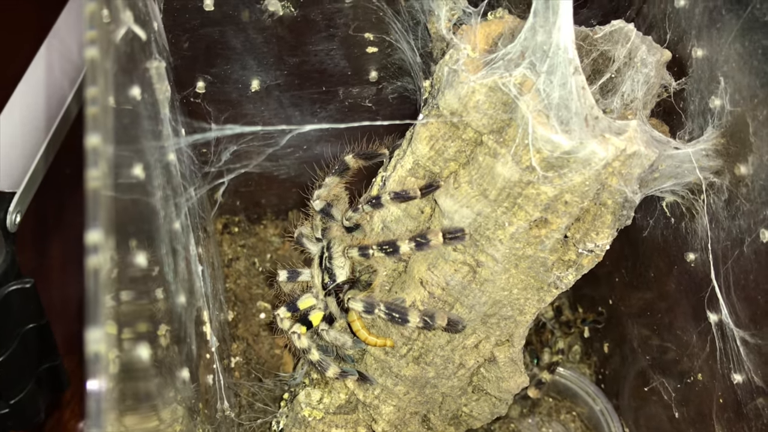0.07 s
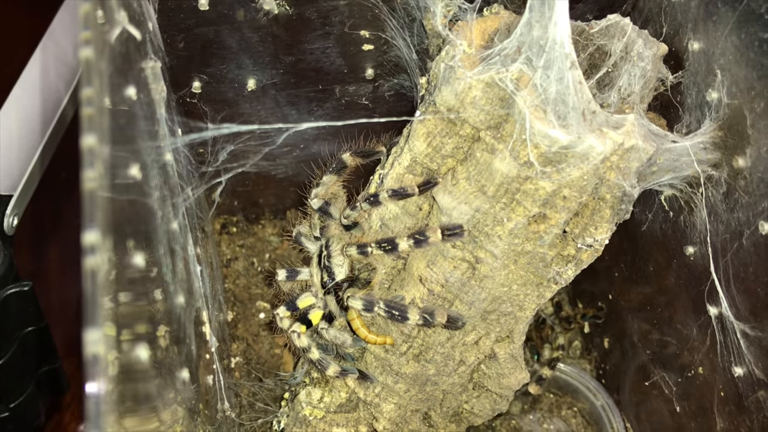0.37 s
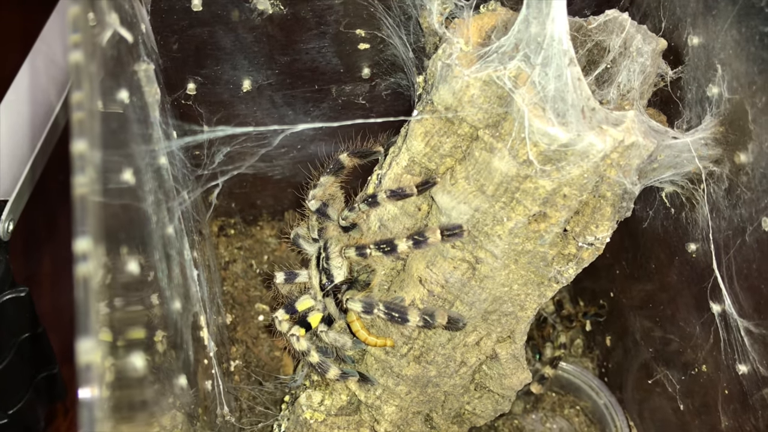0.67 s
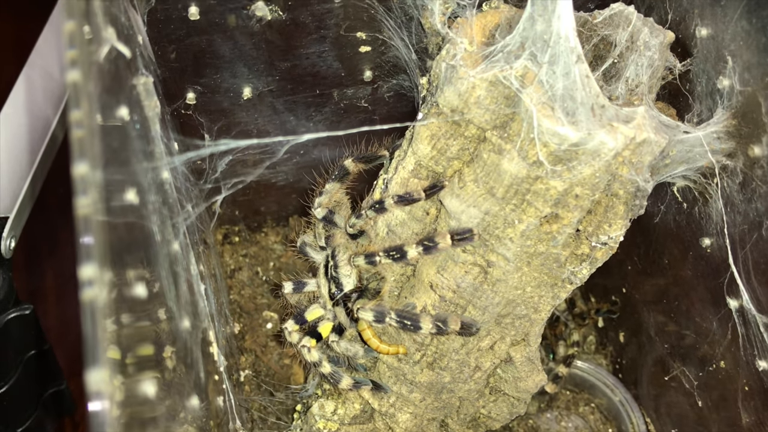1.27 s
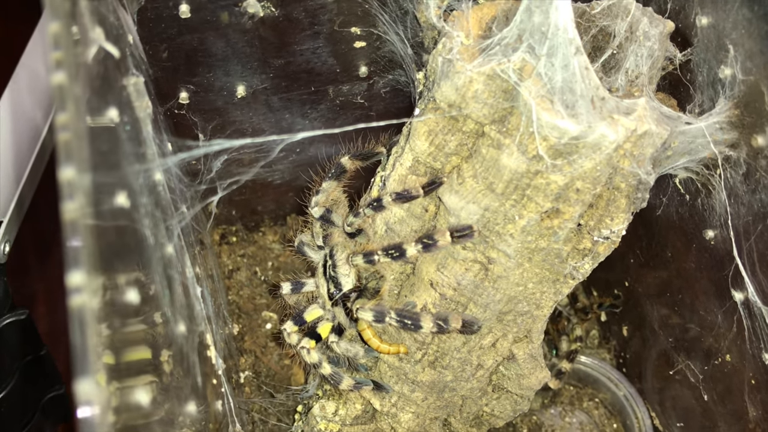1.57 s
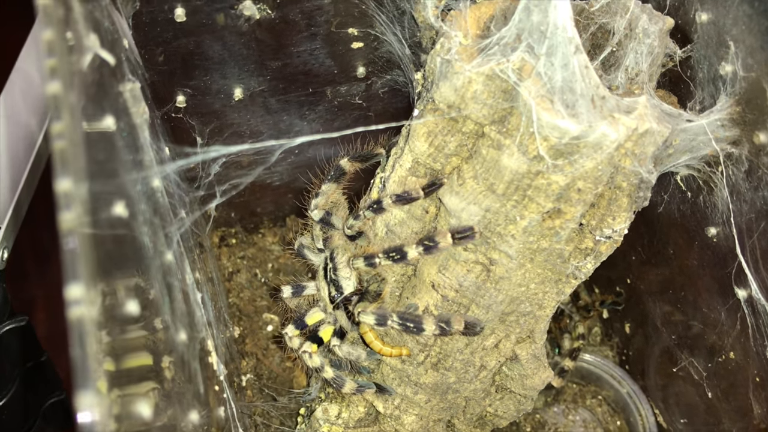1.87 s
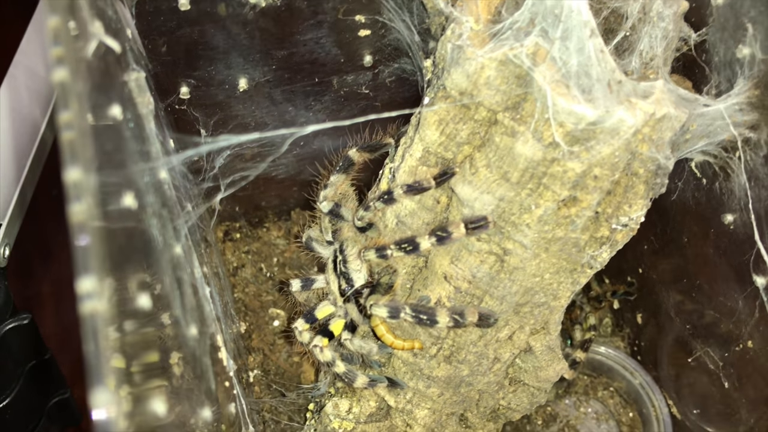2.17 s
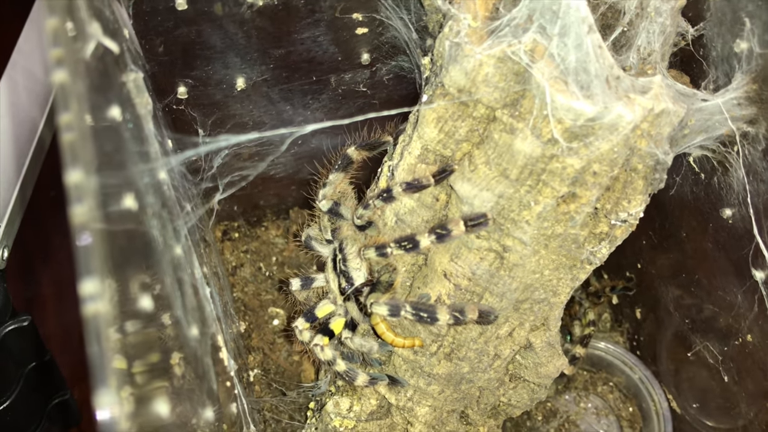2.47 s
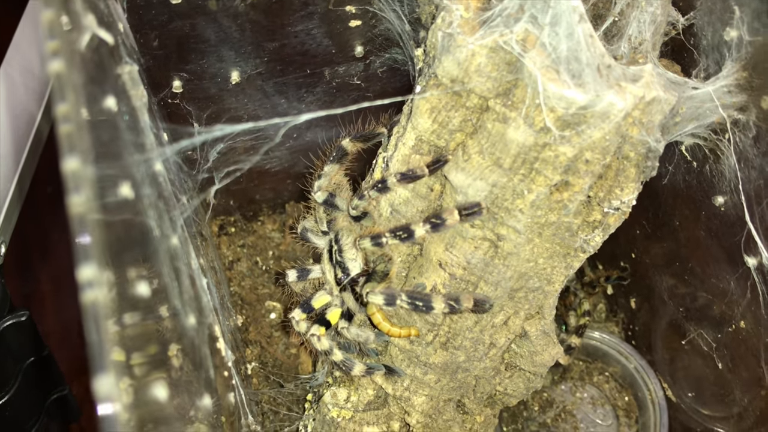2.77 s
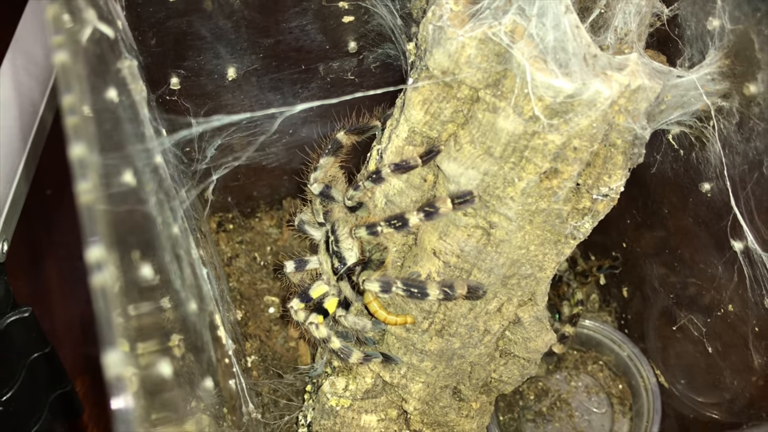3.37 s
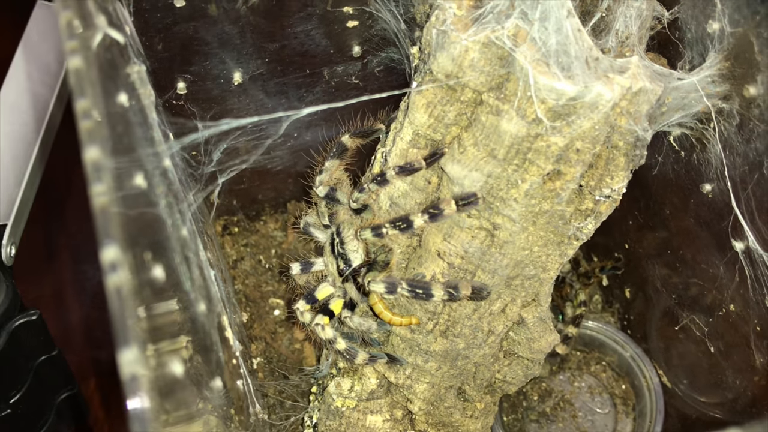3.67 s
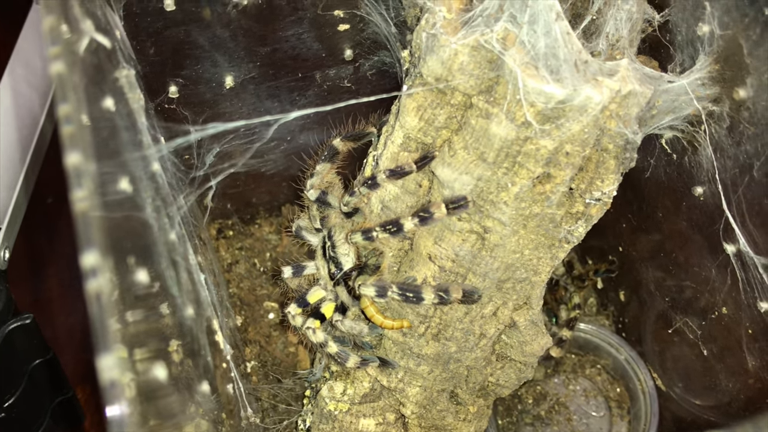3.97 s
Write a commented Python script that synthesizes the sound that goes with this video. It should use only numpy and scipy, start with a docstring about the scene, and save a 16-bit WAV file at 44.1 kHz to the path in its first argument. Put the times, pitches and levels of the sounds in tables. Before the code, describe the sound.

Close handling noise on a camera: scratchy rubs, soft low thumps and sharp little ticks.

```python
"""Fingers shifting on a camera

In a quiet room, fingers change their grip on a camera held over a plastic spider enclosure.
Skin scrapes the casing in short strokes and one longer rub, then in sparser, duller nudges.
Slipping fingertips shudder with a falling low note, the casing bumps softly, and a few dry ticks snap."""
import sys
import numpy as np
from scipy.fft import rfft, irfft, next_fast_len
from scipy.io import wavfile
from scipy.ndimage import map_coordinates

SR = 44100
rng = np.random.default_rng(int(sys.argv[2]) if len(sys.argv) > 2 else 0)


def master(y):
    """Save y as 16-bit WAV."""
    cut = np.clip(np.atleast_2d(y).T, -1, 1)
    pcm = np.round(cut * 32767)  # scale
    wavfile.write(sys.argv[1], SR, pcm.astype(np.int16))


N = 176400


def amp(db):
    """Turn decibels into a number to multiply a sound by."""
    return 10 ** (np.asarray(db) / 20)


def unit(x):
    """Scale a sound to an average strength (rms) of 1."""
    return x / np.sqrt(np.mean(x ** 2) + 1e-20)


def tone_gain(points, hz):
    """Read the gain at each frequency from a curve of (pitch_hz, level_db) points."""
    pitch_hz, level_db = np.transpose(points)
    return amp(np.interp(np.log(hz + 1), np.log(pitch_hz + 1), level_db))


def filtered(x, response):
    """Turn each frequency in a sound up or down by response(hz)."""
    size = next_fast_len(N + SR // 2)
    return irfft(rfft(x, size) * response(np.fft.rfftfreq(size, 1 / SR)), size)[:N]


def highpass(hz, edge_hz, order):
    """Gain that fades out below edge_hz; a higher order is steeper."""
    return np.sqrt(1 - 1 / (1 + (hz / edge_hz) ** (2 * order)))


def shaped_noise(points):
    """Steady noise whose tone follows (pitch_hz, level_db) points."""
    return unit(filtered(rng.standard_normal(N), lambda hz: tone_gain(points, hz)))


def wobble(per_s):
    """A smooth curve through per_s random values each second."""
    values = rng.standard_normal(int(N * per_s / SR) + 4)
    return map_coordinates(values, [np.arange(N) * per_s / SR])


def add(track, start_s, sound):
    """Mix a sound into the track at start_s."""
    start = max(0, round(start_s * SR))
    part = track[start:start + len(sound)]
    part += sound[:len(part)]


def falling_note(t, start_hz, end_hz, sag_s):
    """A vibration whose pitch falls as the contact relaxes."""
    pitch_hz = end_hz + (start_hz - end_hz) * np.exp(-t / sag_s)
    return np.sin(2 * np.pi * np.cumsum(pitch_hz) / SR)


def room(level_db=-65):
    """The low murmur of room air, with microphone hiss."""
    # Tone of the background: pitch_hz, relative_db
    room_tone = [(24, -42), (40, 9), (140, 6.5), (479, -16), (615, -13), (1050, -19.5), (1850, -30.5),
                 (2910, -28.5), (3560, -46), (6170, -26)]
    return amp(level_db) * shaped_noise(room_tone)


def ticks(faint_per_s=10, faint_db=-57, faint_edge_hz=3000, splinter=0.44, splinter_decay_s=0.00021):
    """Hard plastic snaps and splinters for under a millisecond, among faint random ticks."""
    # The clear ticks: time_s, level_db, low_edge_hz
    clear_ticks = [(1.4552, -42, 4000), (1.5718, -47.5, 5000), (1.6791, -46.5, 1500), (1.7272, -32, 1250),
                   (1.7791, -32, 1100), (1.9836, -43.5, 7900), (2.5174, -46, 8000), (2.6602, -49.5, 2000),
                   (2.8472, -47.5, 5500), (3.5877, -46.5, 1990)]
    # Tone of a tick: pitch_hz, relative_db
    tick_tone = [(500, 10), (3000, 2), (9000, 3.5), (12500, 2), (15500, -21.5)]
    out, hz = np.zeros(N), np.fft.rfftfreq(512, 1 / SR)
    t = np.arange(len(hz)) / SR
    chance = rng.random((int(faint_per_s * N / SR), 2))
    faint_ticks = [(when * N / SR, faint_db + 2 * (2 * size - 1), faint_edge_hz) for when, size in chance]
    for time_s, level_db, edge_hz in list(clear_ticks) + faint_ticks:
        bass_cut = 1j * hz / (edge_hz + 1j * hz) * highpass(hz, edge_hz, order=3)
        snap = np.fft.fftshift(irfft(tone_gain(tick_tone, hz) * bass_cut))
        snap /= np.abs(snap).max()
        splinters = splinter * rng.choice([-1, 1], len(t)) * np.exp(-t / splinter_decay_s)
        splinters[0] = 1  # the first crack is the strongest
        add(out, time_s - len(snap) / 2 / SR, amp(level_db) * np.convolve(snap, splinters))
    return out


def friction(ringing, catches_per_s=2500, spread_db=7.5, catch_share=0.49, drift_db=4):
    """Skin ridges catch over a smooth hiss; the casing's ringing notes come and go as the finger moves."""
    # Tone of sliding skin: pitch_hz, relative_db
    skin_tone = [(260, 11), (450, -0.5), (500, -4.5), (589, 2.5), (782, -2.5), (895, -6), (1340, -9),
                 (1810, -9), (3330, -7), (4990, -10.5), (6930, -11.5), (11500, -14), (13500, -23.5),
                 (15800, -30)]
    # Notes the casing rings at: pitch_hz, width_hz, boost_db (multiplied by ringing)
    casing_notes = [(1380, 300, 5), (1670, 380, 3.5), (3570, 1400, 2.5), (6800, 270, 2)]
    catches = (rng.random(N) < catches_per_s / SR) * rng.choice([-1, 1], N)
    catches = catches * amp(spread_db * np.clip(rng.standard_normal(N), -2, 2))
    sliding = np.sqrt(catch_share) * unit(catches) + np.sqrt(1 - catch_share) * rng.standard_normal(N)
    skin = filtered(sliding, lambda hz: tone_gain(skin_tone, hz) * highpass(hz, edge_hz=357, order=3))
    ring = np.zeros(N)
    for pitch_hz, width_hz, boost_db in casing_notes:
        strength = (amp(ringing * boost_db) - 1) * amp(drift_db * wobble(per_s=35))
        ring += strength * filtered(skin, lambda hz: 1 / (1 + 2j * (hz - pitch_hz) / width_hz))
    return unit(skin + ring)


def rub(hiss_gain_db=5.5, flutter_db=1.0, rumble_gain_db=10.5, lumps_db=6.0, firm_grip_db=-64):
    """The sliding hand hisses and makes the casing rumble; a firm grip holds the rumble down."""
    # Strength of the rub, before the hiss and rumble gains: time_s, level_db
    rub_levels = [(0, -72), (.29, -67), (.33, -77.5), (.44, -78), (.6, -69.5), (.79, -62), (0.92, -70.5),
                  (1.03, -74), (1.1, -70), (1.22, -59.5), (1.38, -58.5), (1.46, -64.5), (1.54, -63.5),
                  (1.62, -70.5), (1.75, -71), (1.84, -66.5), (2.1, -72), (2.38, -68.5), (2.6, -74),
                  (2.82, -78.5), (3.0, -73.5), (3.22, -73), (3.38, -80), (3.62, -76.5), (4, -78.5)]
    # Tone of the rumble: pitch_hz, relative_db
    rumble_tone = [(40, -21), (68, 5), (100, -8.5), (150, -10.5), (300, -14), (700, -52)]
    level_db = np.interp(np.arange(N) / SR, *np.transpose(rub_levels))
    hiss = amp(hiss_gain_db + flutter_db * wobble(per_s=80)) * friction(ringing=0.61)
    rumble = amp(rumble_gain_db + lumps_db * wobble(per_s=30.28)) * shaped_noise(rumble_tone)
    return amp(level_db) * hiss + amp(np.minimum(level_db, firm_grip_db)) * rumble


def bumps(thud_gain_db=5.5, usual_db=-37, rise_s=0.0029, decay_s=0.0039, tail_db=-15, tail_decay_s=0.022,
          clack_hz=720, clack_rise_s=0.0013, clack_decay_s=0.0021, pitch_spread=0.06, sag_spread=0.32):
    """Each padded knock, under a different grip, makes a falling thud and a clack of the stiff shell."""
    # Soft knocks on the casing: start_s, level_db (before thud_gain_db)
    knocks = [(0.05, -34.5), (0.116, -34.5), (0.1811, -36), (0.199, -36.5), (0.2448, -36.5), (0.4964, -34),
              (0.513, -37), (0.561, -36), (0.5952, -35), (0.6145, -36.5), (0.659, -36), (0.6809, -37),
              (0.725, -36), (0.779, -36.5), (0.7959, -36.5), (0.828, -36), (0.8686, -36.5), (0.9525, -42),
              (0.9934, -33), (1.074, -33), (1.119, -36.5), (1.1387, -35), (1.1745, -34.5), (1.2075, -33),
              (1.2328, -37.5), (1.2582, -36.5), (1.2924, -37), (1.316, -34.5), (1.359, -35.5),
              (1.404, -33.5), (1.4237, -31.5), (1.4859, -35), (1.54, -43.5), (1.8435, -30), (1.908, -30.5),
              (1.965, -33), (2.303, -32), (2.402, -29.5), (2.887, -48.5), (2.9847, -30.5), (3.1273, -32),
              (3.439, -44.5), (3.5739, -25), (3.688, -37.5)]
    out, t = np.zeros(N), np.arange(SR // 10) / SR
    rise = 1 - np.exp(-(t / rise_s) ** 3)
    fade = np.exp(-t / decay_s) + amp(tail_db) * np.exp(-t / tail_decay_s)
    clack_shape = (1 - np.exp(-(t / clack_rise_s) ** 2)) * np.exp(-t / clack_decay_s)
    clack = clack_shape * np.sin(2 * np.pi * clack_hz * t)
    grips = np.exp([pitch_spread, sag_spread] * rng.standard_normal((len(knocks), 2)))
    for (start_s, level_db), (tuning, stretch) in zip(knocks, grips):
        hardness_db = level_db - usual_db  # harder knocks start higher and clack more
        start_hz = tuning * (364 + 3.5 * hardness_db)
        clack_db = usual_db - 20 + 1.46 * hardness_db
        note = falling_note(t, start_hz, end_hz=62.8, sag_s=0.00704 * stretch)
        thud = amp(level_db + thud_gain_db) * rise * fade * note
        add(out, start_s, thud + amp(clack_db) * clack)
    return out


def shudders(usual_start_hz=239.9, firm_end_hz=72.2, firm_db=-38, hz_per_db=2.5, usual_length_s=0.0591,
             rise_share=0.3486, pitch_spread=0.065, length_spread=0.083, rough_db=2.5, waver=0.12):
    """A slipping fingertip rocks the camera for a few uneven, slowing shakes, then grips again."""
    # Fingertip slips: loudest_at_s, level_db
    slips = [(0.051, -35.5), (0.11, -33.5), (0.138, -35.5), (.183, -35.5), (0.209, -45), (0.245, -35.5),
             (0.308, -49.5), (0.477, -45), (0.522, -39.5), (0.572, -39.5), (0.65, -40), (0.67, -38.5),
             (0.733, -40.5), (0.758, -39.5), (0.849, -42), (0.894, -35.5), (0.93, -39), (1.014, -46.5),
             (1.041, -43), (1.123, -34.5), (1.163, -34.5), (1.206, -39), (1.242, -37.5), (1.311, -38),
             (1.424, -34), (1.477, -42), (1.536, -39.5), (1.841, -35.5), (1.904, -35), (1.925, -44),
             (1.96, -41.5), (2.022, -37.5), (2.195, -39), (2.224, -36.5), (2.298, -38.5), (2.346, -36.5),
             (2.384, -42), (2.513, -37.5), (2.636, -38), (2.706, -37.5), (2.988, -37), (3.02, -38),
             (3.069, -37), (3.136, -38), (3.159, -35.5), (3.22, -47), (3.291, -39.5), (3.354, -46),
             (3.411, -47), (3.442, -44.5), (3.544, -41.5), (3.707, -45.5)]
    out = np.zeros(N)
    unsteady = np.exp(waver * wobble(per_s=100))
    grips = np.exp([pitch_spread, length_spread] * rng.standard_normal((len(slips), 2)))
    for (loudest_at_s, level_db), (tuning, stretch) in zip(slips, grips):
        length_s = usual_length_s * stretch
        rise_s = length_s * rise_share
        t = np.arange(int(length_s * SR)) / SR
        swell = np.sin(np.pi / 2 * np.interp(t, [0, rise_s, length_s], [0, 1, 0])) ** 2
        usual_end_hz = firm_end_hz + hz_per_db * max(0, firm_db - level_db)  # lighter slips end higher
        bend = tuning * unsteady[round(loudest_at_s * SR):][:len(t)]
        note = falling_note(t, bend * usual_start_hz, bend * usual_end_hz, sag_s=0.01263 * stretch)
        add(out, loudest_at_s - rise_s, amp(level_db) * swell * note)
    return out * amp(rough_db * wobble(per_s=170))


def soft_step(x):
    """Climb smoothly from 0 to 1 as x passes zero."""
    return (1 + np.tanh(x / 2)) / 2


def scrapes(flutter_db=2.0, light_below_db=-4, rise_share=0.12, fall_share=0.25):
    """Skin catches and lets go; light strokes have less treble and more of the casing's ring."""
    # Short strokes of skin on the casing: middle_s, length_s, level_db, treble_db
    strokes = [(.012, 0.0078, -58.5, 3), (0.044, 0.012, -54, -5.5), (0.056, 0.012, -62.5, 8),
               (0.085, 0.012, -54, -2), (0.117, 0.025, -47.5, -0.5), (0.158, 0.023, -60.5, 6.5),
               (0.187, 0.022, -50.5, -2), (0.238, 0.03, -49, -1.5), (0.285, 0.0055, -53, 5),
               (0.46, 0.016, -57, 3.5), (0.485, 0.018, -58.5, 4.5), (0.508, 0.016, -47.5, -0.5),
               (0.546, 0.012, -54, 2), (0.572, 0.015, -60, 4), (0.6, 0.012, -49, -4),
               (0.611, 0.011, -51.5, 2), (0.64, 0.015, -52, 0), (0.661, 0.021, -49, -1.5),
               (0.697, 0.0061, -55, 3), (0.723, 0.014, -50.5, -1.5), (0.754, 0.016, -59, -1),
               (0.774, 0.014, -51.5, -5), (0.8, 0.01, -52.5, -0.5), (0.835, 0.0082, -54, 1),
               (.859, 0.01, -51.5, -3), (0.892, 0.021, -48.5, 0), (0.939, 0.0087, -54, 2.5),
               (0.974, 0.016, -52, -1), (1.019, 0.01, -54, 1), (1.048, 0.014, -59.5, 4),
               (1.068, 0.02, -49.5, -1), (1.1, 0.029, -51, 1), (1.126, 0.019, -49.5, 0),
               (1.155, 0.013, -49.5, 0), (1.189, 0.021, -54, -2), (1.25, 0.034, -53.5, -10),
               (1.413, 0.014, -51.5, -5), (1.464, 0.025, -52, -1), (1.648, 0.01, -66, 6),
               (1.791, 0.014, -58.5, 1), (1.829, 0.028, -52, -2), (1.906, 0.026, -56.5, -4),
               (1.956, 0.027, -56.5, -3), (2.024, 0.025, -59.5, -4.5), (2.17, 0.015, -53.5, -6),
               (2.213, 0.046, -56.5, -1.5), (2.292, 0.016, -57.5, -4), (2.33, 0.017, -57.5, -4),
               (2.392, 0.022, -59.5, -3), (2.433, 0.018, -61.5, -6), (2.494, 0.017, -57.5, -10),
               (2.573, 0.011, -61, -10), (2.621, 0.0059, -59.5, -12), (2.637, 0.01, -60, -5),
               (2.687, 0.0064, -57.5, -11), (2.705, 0.013, -60.5, -4), (2.937, 0.015, -62, -5),
               (2.982, 0.022, -60, -5), (3.044, 0.012, -58.5, -5), (3.149, 0.036, -61, -1.5),
               (3.28, 0.025, -61.5, -1), (3.533, 0.046, -65.5, 1), (3.577, 0.0093, -61.5, -5.5),
               (3.675, 0.008, -68.5, -5.5), (3.742, 0.015, -63, -4.5)]
    out, t = np.zeros(N), np.arange(N) / SR
    for light, grit in ((False, friction(ringing=1.0)), (True, friction(ringing=1.7))):
        treble = filtered(grit, lambda hz: highpass(hz, edge_hz=5200, order=4) ** 2)
        body_power, treble_power = np.zeros(N), np.zeros(N)
        for middle_s, length_s, level_db, treble_db in strokes:
            if (treble_db < light_below_db) == light:
                position = (t - middle_s) / length_s  # -0.5 at the start, 0.5 at the end
                catch = soft_step((position + 0.5) / rise_share)
                let_go = soft_step((0.5 - position) / fall_share)
                stroke = amp(level_db) * catch * let_go
                body_power += stroke ** 2
                treble_power += (stroke * amp(treble_db)) ** 2
        out += np.sqrt(body_power) * (grit - treble) + np.sqrt(treble_power) * treble
    return amp(flutter_db * wobble(per_s=160)) * out


def scene():
    """The handling sounds reach the microphone through the casing, so they have no echo."""
    return (scrapes() + rub() + shudders() + bumps() + ticks() + room())[None]


def record(dry):
    """The camera cuts the deepest bass and the very highest treble."""
    top_hz = 15850
    return filtered(dry[0], lambda hz: highpass(hz, edge_hz=42, order=4) * (hz < top_hz))[None]


dry = scene()
out = record(dry)
master(out)
```